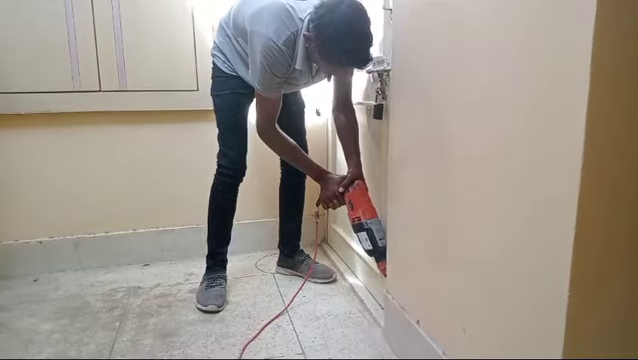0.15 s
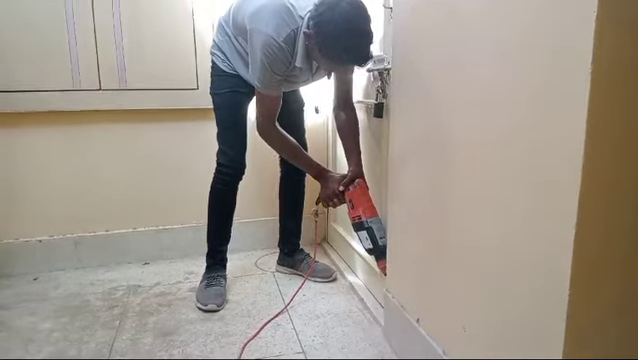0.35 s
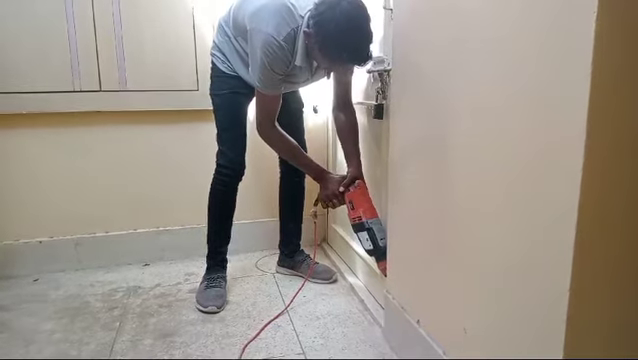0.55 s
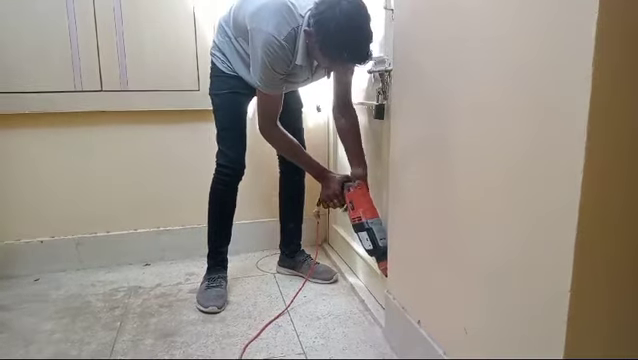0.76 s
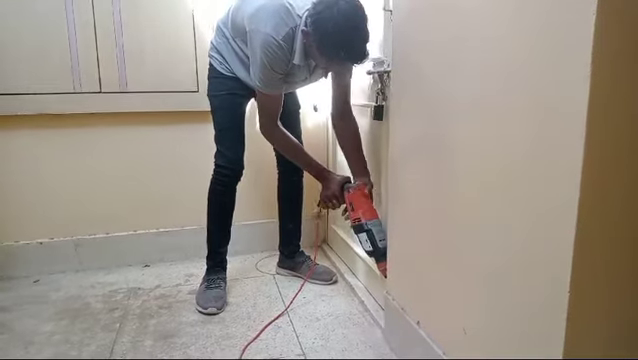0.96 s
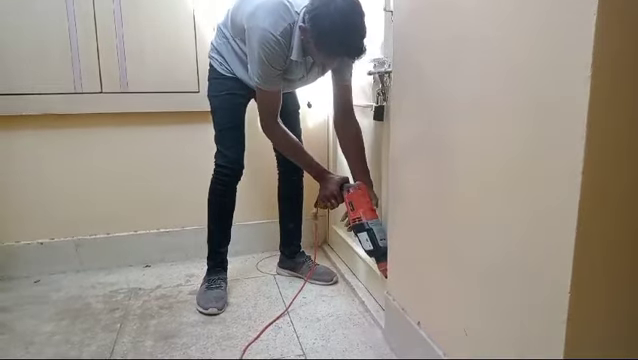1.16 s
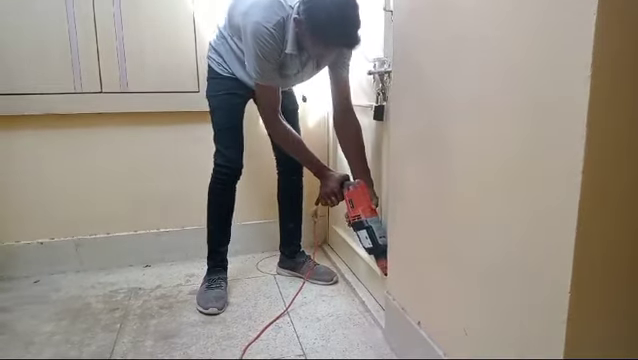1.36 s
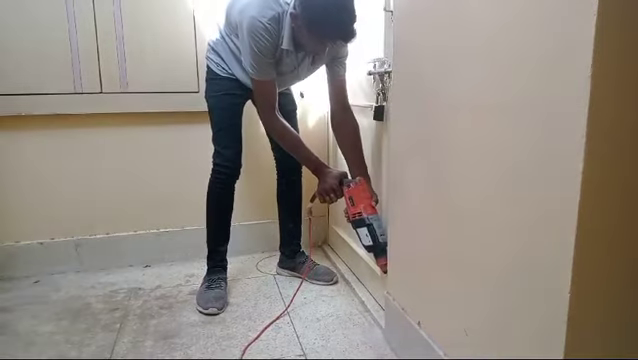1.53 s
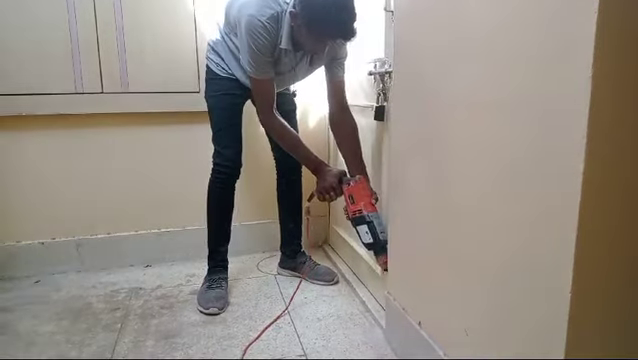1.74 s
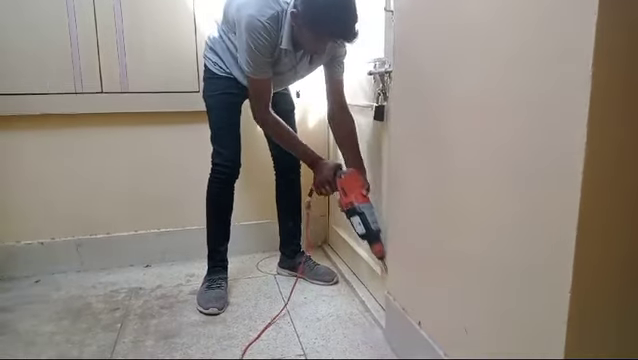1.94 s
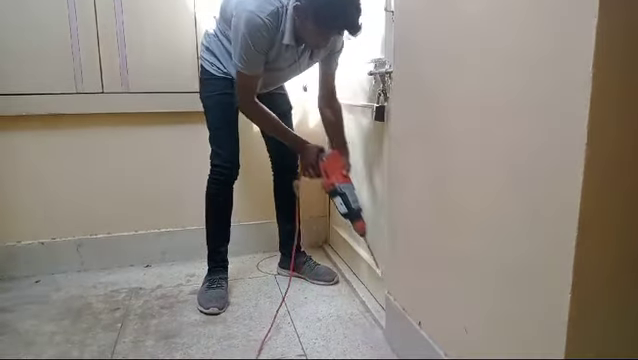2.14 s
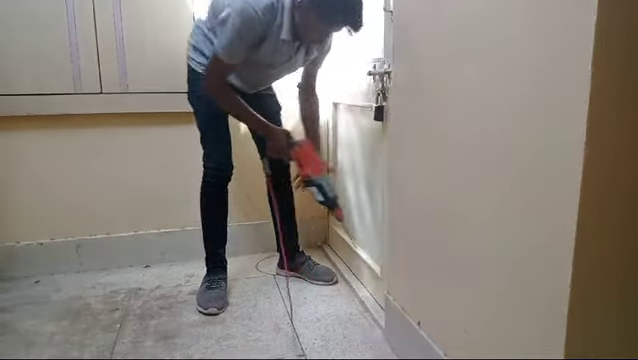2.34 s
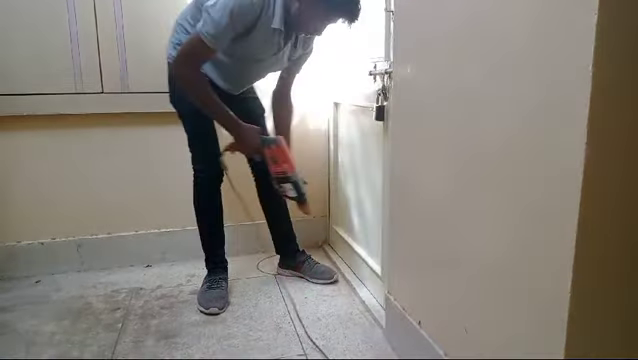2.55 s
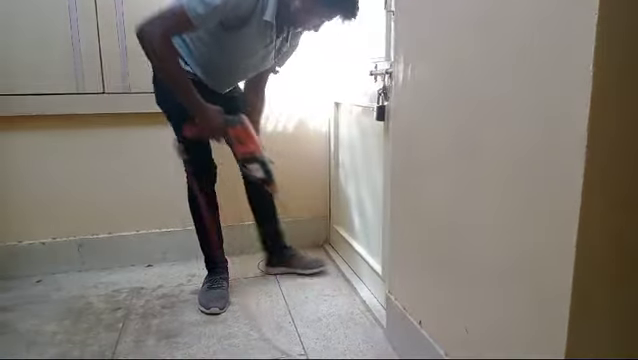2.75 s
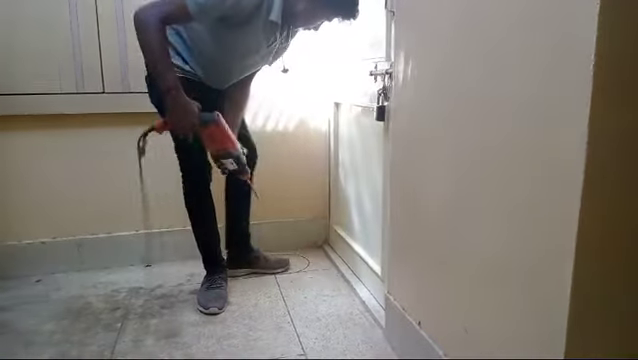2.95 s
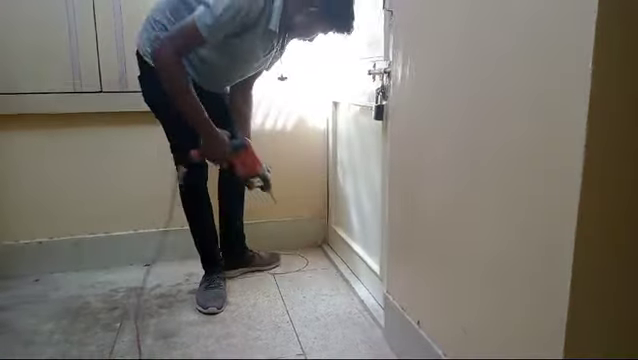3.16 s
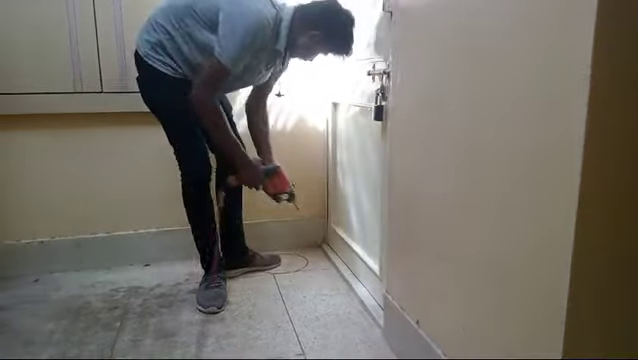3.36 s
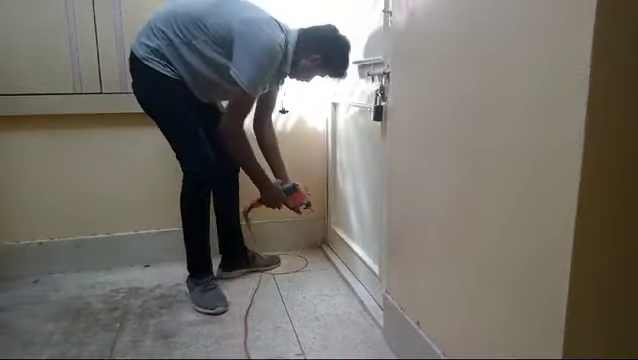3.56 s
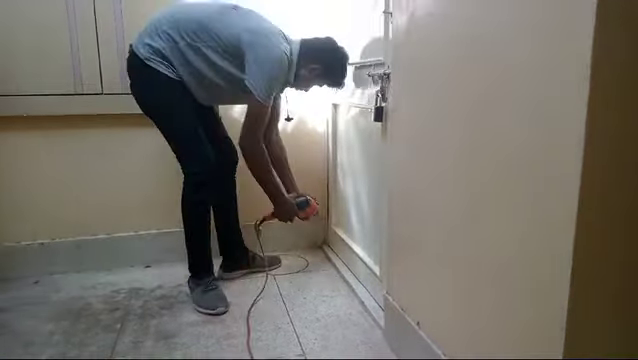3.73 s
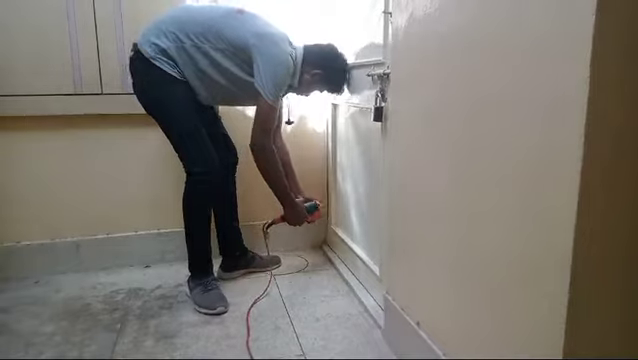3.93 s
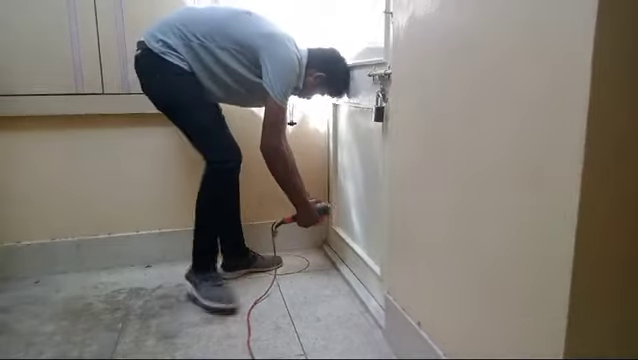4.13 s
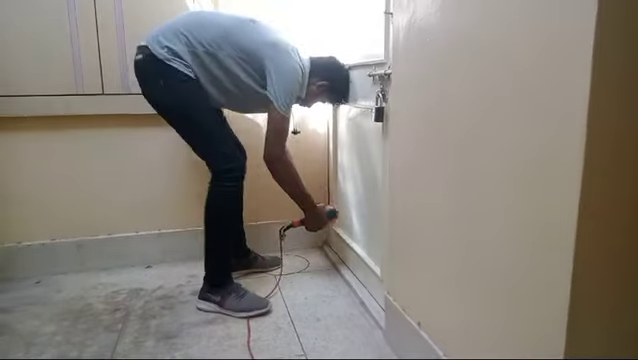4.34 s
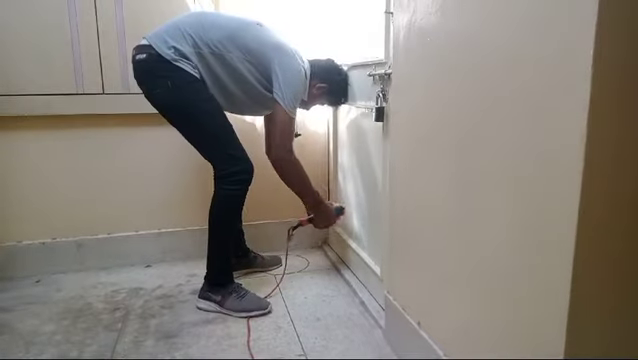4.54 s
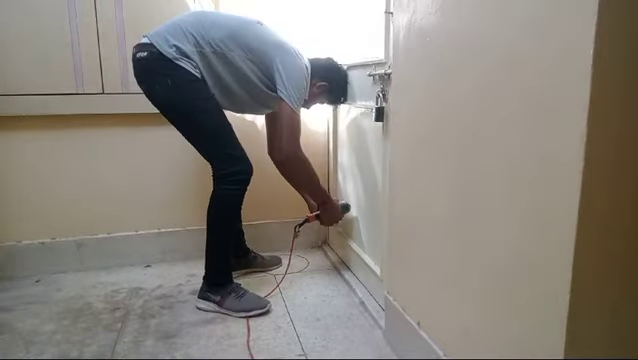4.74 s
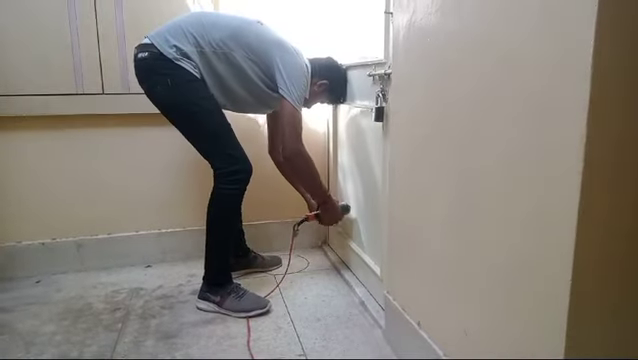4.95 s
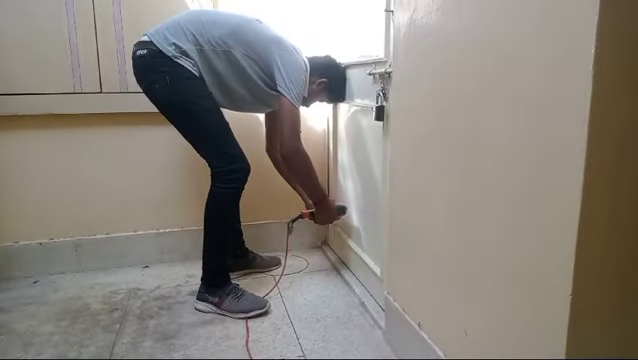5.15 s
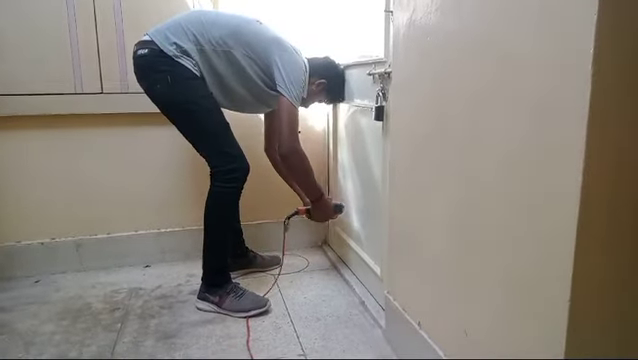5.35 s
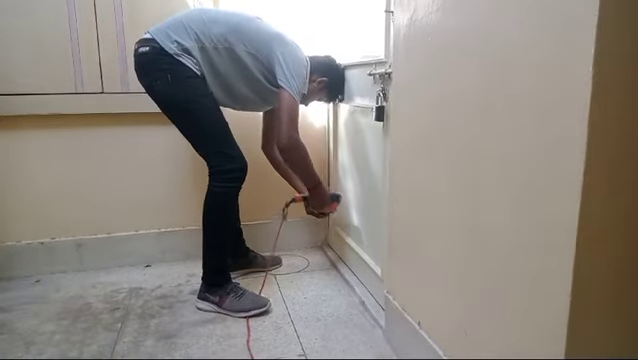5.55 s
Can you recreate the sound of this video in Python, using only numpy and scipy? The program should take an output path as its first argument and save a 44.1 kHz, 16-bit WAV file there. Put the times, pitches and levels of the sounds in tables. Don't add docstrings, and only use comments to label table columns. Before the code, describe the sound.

Close indoor phone capture of a corded hammer drill boring hard floor: dense gritty roar with fast hammering, a brief sag, then a loose door panel buzzing along. The motor lifts free, spins down and stops; light clicks and a shoe scuff sit over a distant hum. A trigger click, and the drill slams back, harder and louder, with low knocks on the phone near the end.

```python
import sys
import numpy as np
from scipy import signal
from scipy.fft import rfft, irfft
from scipy.io import wavfile
from scipy.ndimage import uniform_filter1d

SR = 44100
rng = np.random.default_rng(int(sys.argv[2]) if len(sys.argv) > 2 else 0)


def persist_wave(psi):
    counts = np.round(np.clip(psi, -1, 1) * 32767).astype(np.int16)
    wavfile.write(sys.argv[1], SR, np.atleast_2d(counts).T)


def invert_db(x):
    u = np.asarray(x, float) / 20
    return 10 ** u


N = 246519
T = np.arange(N) / SR

# frequency in Hz, level in dB rms.
HUM = [(89.4, -39), (178.8, -48), (298, -55)]
# frequency in Hz, density in dB per Hz.
AIR_SPECTRUM = [(130, -30), (220, -4.5), (450, -6), (870, -10.5), (1300, -13.5), (2000, -10), (2700, -10.5),
                (3050, -19), (4000, -16), (4700, -26), (5600, -30.5), (7400, -34), (9200, -43),
                (15500, -59)]
RUMBLE_SPECTRUM = [(30, -38), (50, -27), (70, -8), (90, 4), (120, -4.5), (180, -6), (240, -13), (300, -38)]
AIR_DB, RUMBLE_DB = -39.5, -50
WHINE_HZ, WHINE_WIDTH_HZ, WHINE_DB = 1570, 110, -47
DUCKED_DB, DEEP_DB, OPEN_DB = -7.5, -4, 1.54
LULL_S, LULL_LENGTH_S, LULL_RISE_S, LULL_FALL_S = 2.445, 2.12, 0.025, 0.3

# frequency in Hz, t60 in seconds.
ROOM = [(250, 0.26), (2000, 0.63), (8000, 0.8), (15000, 0.24)]

# start in seconds, length in seconds, pitch in Hz, level in dB.
BLOW_BUZZ = [
    (1.44, .06, 331, -41),
    (1.54, .18, 356.5, -37.5),
    (1.76, 0.14, 355, -38),
    (1.91, 0.197, 344, -37),
]

# peak in seconds, rise in seconds, fall in seconds, level in dB.
SCUFFS = [
    (3.57, .1, .3, -64.5),
    (3.68, .25, 0.16, -55.5),
    (4.226, .13, .2, -66),
    (4.36, .01, .2, -66),
]
SCUFF_SWELL_DB = 25
# frequency in Hz, density in dB per Hz.
SOLE_SPECTRUM = [(1500, 2), (2500, 15.5), (3000, 5.5), (4000, 7), (5500, -3), (7500, -0.5), (10000, -13),
                 (15000, -14), (15600, -18)]
# time in seconds, peak in dB, t60 in seconds.
CLICKS = [
    (3.1559, -32, 0.073),
    (3.2861, -37, 0.06),
    (4.3611, -48, 0.06),
]
TRIGGER_S, TRIGGER_DB, TRIGGER_T60_S = 4.5225, -42, 0.16
CORD_S, CORD_DB, CORD_T60_S = 3.5192, -38, 0.15
# frequency in Hz, density in dB per Hz.
TRIGGER_SPECTRUM = [(1500, -30), (4000, -6), (7500, 0), (10300, -10), (13000, -5), (15600, -9)]
JOLT_SPECTRUM = [(40, -30), (120, -8), (200, -2), (350, 0), (500, -5), (800, -20)]
# time in seconds, peak in dB, pitch in Hz.
JOLTS = [(5.281, -36, 110), (5.294, -29, 95), (5.321, -33, 140), (5.347, -26, 150), (5.374, -21, 120),
         (5.446, -35, 110), (5.477, -33, 150), (5.549, -31, 110), (5.568, -34, 120)]

# time in seconds, casing and gears in dB, depth of the bit in its hole 0-1.
COURSE = [(0, -16.5, 0.34), (.5, -17.5, 0.2), (.55, -17, 0.05), (.96, -18, 0.3), (1.2, -23.5, 0.44),
          (1.34, -15, 0.6), (1.5, -17.5, 0.86), (1.98, -16.5, 1), (2.14, -21, 0.6), (2.435, -25.5, 0.25),
          (2.505, -18.5, 0.4), (3.15, -28, 0.7), (3.47, -40, .35), (4.525, -36, 0.1), (4.57, -25, 0),
          (4.63, -14.5, 0), (5.3, -13.5, 0.5), (5.59, -17, 0.6)]
# time in seconds, blows per second, hardness of the blows.
BLOWS = [(0, 63, .6), (.82, 62.8, .6), (.98, 53, .45), (1.16, 52, .45), (1.42, 66, .5), (1.6, 71, .4),
         (2.1, 69, .2), (2.45, 55, .12), (3.5, 25, .1), (4.52, 40, .5), (4.63, 54, 1.1), (4.86, 71, .9),
         (5.0, 76.5, .55), (5.2, 78.5, .6), (5.3, 75, .75), (5.46, 69, .7), (5.59, 67, .7)]
STRUCK_S = (0.274, 4.691)
NEW_HOLE_S = 4
FULL_DB = -17
STILL_S, DIE_DB_PER_S = 3.47, 200
LIFT_S, LIFT_LENGTH_S, LIFT_RISE_S, LIFT_FALL_S = 2.43, 1.5, 0.04, 0.1
# low edge in Hz, high edge in Hz.
ZONE_EDGES = [(1500, 5000), (300, 1500), (5000, 9500), (10000, 15500)]
ZONE_CENTRES_HZ = [2800, 800, 7000, 12500]
# level in dB, dB at full depth, dB per dB of slowing,
# dB once lifted.
ZONE_LOADS = [(-9, -0.1, 0.0, -1), (-12.5, 0.5, 0.37, -2.5), (-27, 0.7, .17, -3.5)]
# frequency in Hz, density in dB per Hz.
CASING = [(60, -55), (100, -26), (160, -31.5), (350, -17), (900, -8), (1200, -9.5), (2140, 0), (2940, -6.5),
          (3710, -3), (5540, -17), (7450, -16.5), (10300, -30.5), (11600, -31), (15500, -39)]
# frequency in Hz, width in Hz, boost in dB.
HOLLOWS = [(865, 50, -1), (2274, 390, 8.5), (3820, 570, 4.5), (7120, 1100, 2.5)]
# frequency in Hz, share of the noise per unit hardness.
BLOW_SHARE = [(300, .25), (2000, .45), (6000, .6), (12000, 1.0)]
HOLE_HZ, HOLE_WIDTH_HZ, HOLE_DB, HOLE_DEEP_DB = 1400, 230, -2.5, 10
GRIP_HZ, GRIP_WIDTH_HZ = 2200, 260
GRIP_DB, GRIP_DEEP_DB, GRIP_HARD_DB, GRIP_LIFTED_DB = -5, 0.9, 3.5, 0.5

# frequency in Hz, width in Hz.
BIT = [(11550, 350), (13400, 3200)]
# start in seconds, length in seconds, shank and tip in dB against the casing.
CHATTER = [(-.05, .6, -45, -31), (.06, .06, -31, -37), (.26, 0.26, -36, -32), (.6, .4, -44, -33),
           (.72, 0.14, -28, -36), (1.06, .19, -31, -30), (1.28, 0.11, -40, -31), (2.12, .22, -33, -46),
           (2.45, .3, -36, -57), (2.899, .15, -44, -34), (4.68, .5, -47, -45), (5.2, .4, -31, -29)]
CHATTER_EDGE_S = 0.03
# start in seconds, length in seconds, level in dB, slope in dB per second.
SQUEAL = [
    (-.1, 1.45, -56, 2),
    (5.196, 1, -30, -22),
]
# frequency in Hz, density in dB per Hz.
TIP_SPECTRUM = [(9000, -36), (11000, -24), (13500, -17), (14800, -9), (15300, 2), (15460, 0), (15700, -5)]
# multiple of the blow rate, dB at first, dB once the bit is seated.
SHAKE = [(1, -62, -60), (2, -46, -60), (3, -50, -47), (4, -54, -56), (5, -54, -47), (6, -46, -47),
         (8, -48, -49), (9, -47, -45), (10, -47, -43), (11, -46, -50), (12, -46, -41), (13, -43, -49),
         (14, -46, -50), (15, -43, -44), (16, -43, -49)]
SEATED_S = 1.1
# start in seconds, length in seconds, level in dB.
PRESSED = [
    (-.1, 1.03, 0),
    (1.0, .3, -11),
    (1.35, .77, -8),
    (4.76, .9, 1),
]
# frequency in Hz, level in dB at full load.
TILES = [(610, -46.5), (690, -44), (770, -44), (830, -41), (925, -40.5), (1010, -49), (1160, -57)]


def evened(x):
    return x / np.sqrt(np.mean(x ** 2) + 1e-20)


def noise():
    return rng.standard_normal(N)


def read(points, hz):
    f, value = np.transpose(points)
    return np.interp(np.log(hz + 1), np.log(f + 1), value)


def along(rows, t):
    s, *columns = np.transpose(rows)
    return [np.interp(t, s, c) for c in columns]


def held(start, length, rise, fall):
    return np.clip(np.minimum((T - start) / rise, 1 - (T - start - length) / fall), 0, 1)


def dip(hz, centre_hz, width_hz):
    return 1 / (1 + ((hz - centre_hz) / width_hz) ** 2)


def coloured(x, points):
    hz = np.fft.rfftfreq(N, 1 / SR)
    padded = [(1, -120)] + list(points) + [(SR / 2, -120)]
    return evened(irfft(rfft(x) * invert_db(read(padded, hz)), N))


def resonate(x, hz, width_hz):
    turn = np.exp(2j * np.pi * np.cumsum(hz * np.ones(N)) / SR)
    r = np.exp(-np.pi * width_hz / SR)
    smooth = signal.lfilter([1], np.convolve([1, -r], [1, -r]), x / turn)
    return evened((turn * smooth).real)


def wander(per_s):
    return evened(signal.lfilter(*signal.butter(1, per_s / SR), noise()))


def room(x):
    hz, t, z = signal.stft(rng.standard_normal(SR // 2), SR, nperseg=256)
    tail = signal.istft(z * invert_db(-60 * t / read(ROOM, hz)[:, None]), SR, nperseg=256)[1]
    return signal.fftconvolve(x, np.r_[np.zeros(200), tail] / np.linalg.norm(tail))[:N]


def background():
    hum = sum(invert_db(db + 1 + 1.8 * wander(5.3)) * np.sin(2 * np.pi * hz * T) for hz, db in HUM)
    air = invert_db(AIR_DB + 0.5 * wander(10)) * coloured(noise(), AIR_SPECTRUM)
    rumble = invert_db(RUMBLE_DB) * coloured(noise(), RUMBLE_SPECTRUM)
    whine = invert_db(WHINE_DB + 1.0 * wander(25)) * resonate(noise(), WHINE_HZ, WHINE_WIDTH_HZ)
    ducked_db = DUCKED_DB + DEEP_DB * np.clip(along(COURSE, T)[1], 0, 1)
    lull = held(LULL_S, LULL_LENGTH_S, LULL_RISE_S, LULL_FALL_S)
    return (hum + air + rumble + whine) * invert_db(ducked_db + (OPEN_DB - ducked_db) * lull)


def scuffs(grit):
    swell = 0
    for s, rise, fall, db in SCUFFS:
        swell += invert_db(db - SCUFF_SWELL_DB * np.maximum((s - T) / rise, (T - s) / fall))
    return swell * invert_db(15.5 + 1.1 * wander(200)) * grit


def click_decay(s, db, t60):
    return invert_db(db - 60 * np.maximum(T - s, 0) / t60) * (T >= s)


def clicks(grit):
    hits = sum(click_decay(*row) for row in CLICKS) * grit
    tap = click_decay(CORD_S, CORD_DB, CORD_T60_S) * resonate(grit, 4000, 1500)
    snap = click_decay(TRIGGER_S, TRIGGER_DB, TRIGGER_T60_S) * coloured(noise(), TRIGGER_SPECTRUM)
    dry_clicks = hits + tap + snap
    return dry_clicks + invert_db(0.5) * room(dry_clicks)


def jolts():
    swings = 0
    for s, db, hz in JOLTS:
        swing = np.sin(2 * np.pi * (hz * (T - s) + rng.random()))
        swings += invert_db(db) * np.exp(-((T - s) * hz * 1.9) ** 2) * swing
    rumble = invert_db(-31) * np.exp(-((T - 5.34) / 0.09) ** 2) * coloured(noise(), JOLT_SPECTRUM)
    return swings + rumble


def small_sounds():
    grit = coloured(noise(), SOLE_SPECTRUM)
    return scuffs(grit) + clicks(grit) + jolts()


def blow_buzz():
    source = noise()
    buzz = 0
    for s, length, hz, db in BLOW_BUZZ:
        tone = resonate(source, hz, 9.2) + invert_db(-5) * resonate(source, 2 * hz, 29)
        buzz += invert_db(db) * held(s, length, 0.025, 0.034) * tone
    return invert_db(2.0 * wander(30)) * buzz


def floor_shake(turns):
    shake = 0
    for k, db, seated_db in SHAKE:
        level_db = np.where(T < SEATED_S, db, seated_db) + (1.5 + 0.15 * k) * wander(10)
        shake += invert_db(level_db) * np.sin(2 * np.pi * (k * turns + rng.random()))
    return shake * sum(invert_db(db) * held(s, length, 0.063, 0.075) for s, length, db in PRESSED)


def loose_tiles(blows, rumble_db):
    rings = 0
    for hz, db in TILES:
        rings += invert_db(db + 4 * wander(14)) * resonate(blows, hz * (1 + 0.025 * wander(5)), 40)
    return rings * invert_db(rumble_db + 25.5)


def bit_ring(blows, casing_db):
    rings = 0
    for s, length, *db in CHATTER:
        rings = rings + np.outer(invert_db(np.array(db)), held(s, length, CHATTER_EDGE_S, CHATTER_EDGE_S))
    rings = rings * invert_db(casing_db)
    return sum(ring * invert_db(2.0 * wander(13)) * resonate(blows, hz, width) for ring, (hz, width) in zip(rings, BIT))


def tip_squeal(ticks):
    level = 0
    for s, length, db, slope_db in SQUEAL:
        level += held(s, length, 0.05, 0.05) * invert_db(db + slope_db * np.maximum(T - s, 0))
    return level * coloured(ticks, TIP_SPECTRUM)


def hammer(rate):
    turns = np.cumsum(rate * (1 + 0.01 * wander(30))) / SR
    first, second = np.interp(STRUCK_S, T, turns) % 1
    turns += 1 - np.where(T < NEW_HOLE_S, first, second)
    chance = rng.standard_normal((600, 2))[turns.astype(int)]
    size, rebound = invert_db(2.0 * chance[:, 0]), invert_db(2.5 * chance[:, 1])
    since = turns % 1 / rate
    late = since - 0.0055
    burst = size * np.exp(-since / 0.004)
    burst += 0.74 * rebound * (late > 0) * np.exp(-abs(late) / 0.0012)
    contact = size * (np.exp(-since / 0.0009) + 0.18)
    return turns, evened(burst * noise()), contact * noise()


def zone_levels(t, depth, lifted):
    casing_db = along(COURSE, t)[0]
    casing_db -= DIE_DB_PER_S * np.maximum(t - STILL_S, 0) * (t < TRIGGER_S)
    zones_db = [casing_db]
    for db, deep_db, slowing, lifted_db in ZONE_LOADS:
        load_db = db + deep_db * depth + slowing * (casing_db - FULL_DB) + lifted_db * lifted
        zones_db.append(casing_db + load_db)
    return zones_db


def casing(blows, hard):
    source = noise() * invert_db(0.4 * wander(90))
    hz, t, roar = signal.stft(source, SR, nperseg=256, noverlap=192)
    struck = signal.stft(blows, SR, nperseg=256, noverlap=192)[2]
    hard, lifted = np.interp(t, T, hard), np.interp(t, T, held(LIFT_S, LIFT_LENGTH_S, LIFT_RISE_S, LIFT_FALL_S))
    depth = along(COURSE, t)[1]
    share = np.clip(read(BLOW_SHARE, hz)[:, None] * hard, 0, 1)
    z = np.sqrt(1 - share) * roar + np.sqrt(share) * struck

    shape_db = read(CASING, hz) + sum(db * dip(hz, f, w) for f, w, db in HOLLOWS)
    zones_db = zone_levels(t, depth, lifted)
    lack_db = []
    for db, (lo, hi) in zip(zones_db, ZONE_EDGES):
        power = np.sum(invert_db(2 * shape_db[(hz > lo) & (hz < hi)]) / len(hz))
        lack_db.append(db - 10 * np.log10(power))
    centres = np.log(ZONE_CENTRES_HZ)
    order = np.argsort(centres)
    blend = np.array([np.interp(np.log(hz + 1), centres[order], order == k) for k in range(4)])
    patches = uniform_filter1d(rng.standard_normal(z.shape), size=4, axis=0)
    patches = evened(uniform_filter1d(patches, size=50, axis=1))
    z *= invert_db(shape_db[:, None] + blend.T @ np.array(lack_db) + 1.15 * patches)

    z *= invert_db(np.outer(dip(hz, HOLE_HZ, HOLE_WIDTH_HZ), HOLE_DB + HOLE_DEEP_DB * depth))
    grip_db = GRIP_DB + GRIP_DEEP_DB * depth + GRIP_HARD_DB * hard + GRIP_LIFTED_DB * lifted
    z *= invert_db(np.outer(dip(hz, GRIP_HZ, GRIP_WIDTH_HZ), grip_db))
    body = signal.istft(z, SR, nperseg=256, noverlap=192)[1][:N]
    return body, np.interp(T, t, zones_db[0]), np.interp(T, t, zones_db[1])


def drill():
    rate, hard = along(BLOWS, T)
    turns, blows, ticks = hammer(rate)
    blows = evened(blows + invert_db(-2.5) * room(blows))
    body, casing_db, rumble_db = casing(blows, hard)
    floor = floor_shake(turns) + loose_tiles(blows, rumble_db)
    return floor + bit_ring(blows, casing_db) + tip_squeal(ticks) + body


def scene():
    return (background() + small_sounds() + blow_buzz() + drill())[None]


def top_cut(x):
    return signal.sosfilt(signal.butter(12, 16520, fs=SR, output="sos"), x)


def record(dry):
    cut = signal.lfilter(*signal.butter(2, 2 * 40 / SR, "high"), dry)
    limited = np.tanh(cut / 1.05) * 1.05
    edge = signal.firwin(1601, 15530, window=("kaiser", 9), fs=SR)
    mix = signal.oaconvolve(limited, edge[None], "same")
    return top_cut(mix)


dry = scene()
out = record(dry)
persist_wave(out)
```